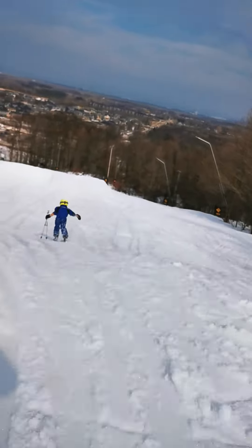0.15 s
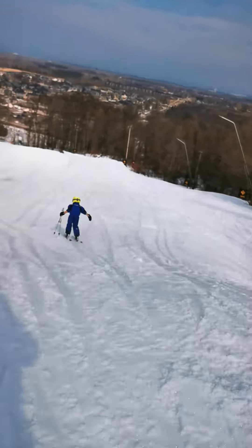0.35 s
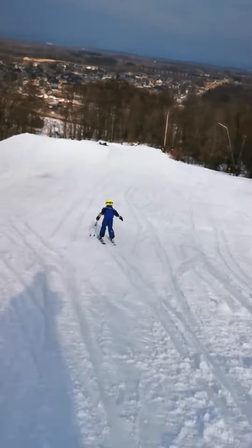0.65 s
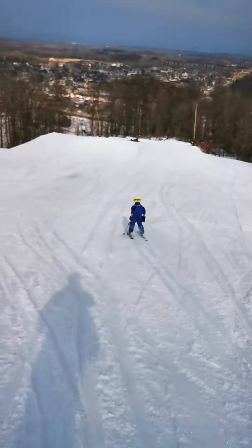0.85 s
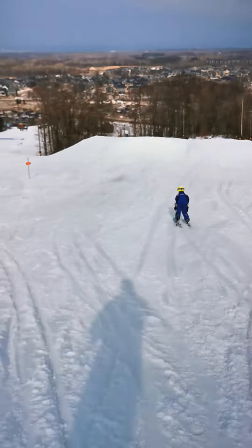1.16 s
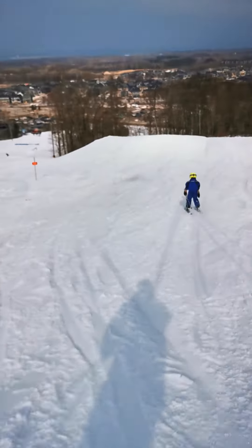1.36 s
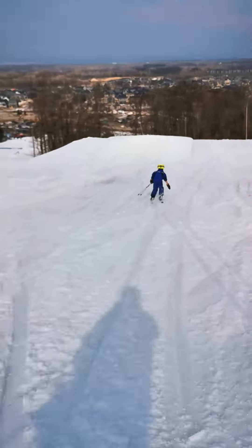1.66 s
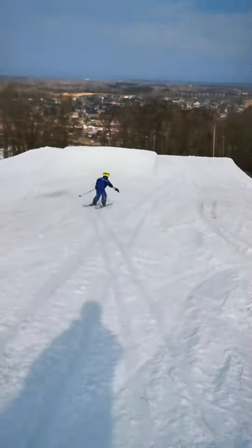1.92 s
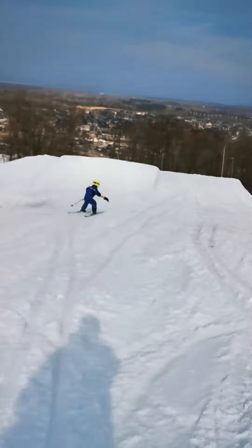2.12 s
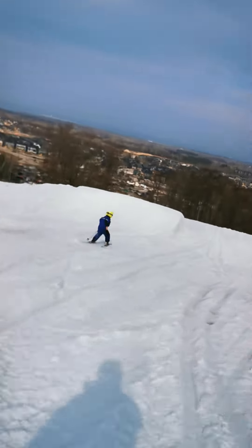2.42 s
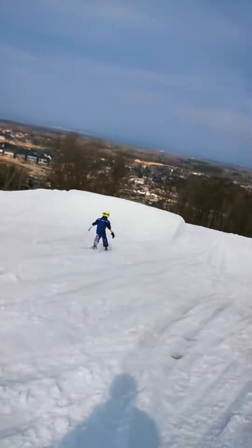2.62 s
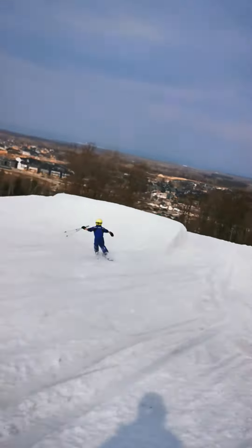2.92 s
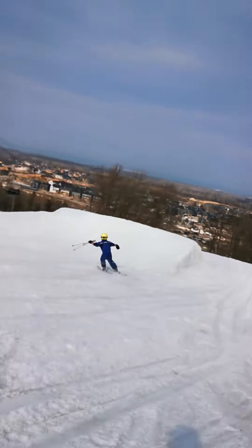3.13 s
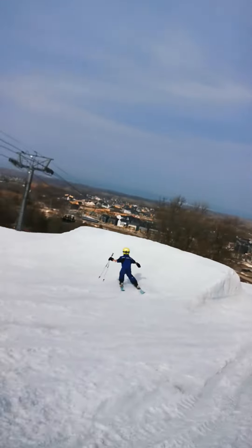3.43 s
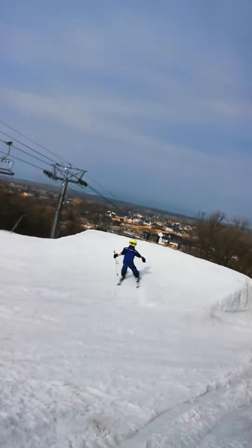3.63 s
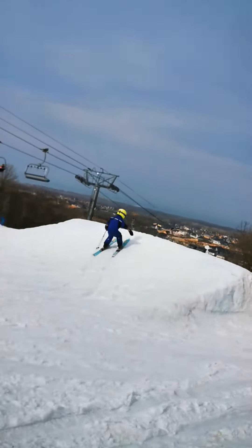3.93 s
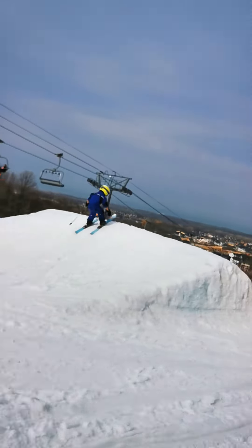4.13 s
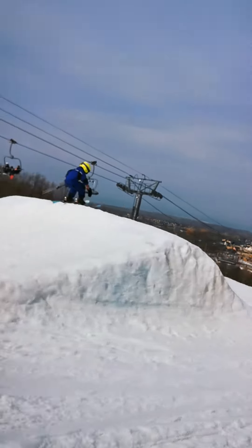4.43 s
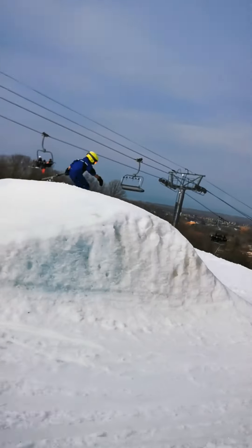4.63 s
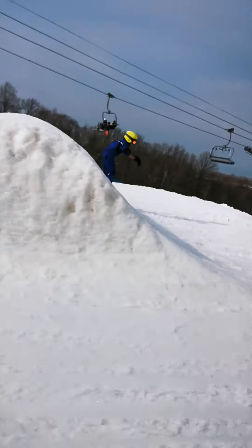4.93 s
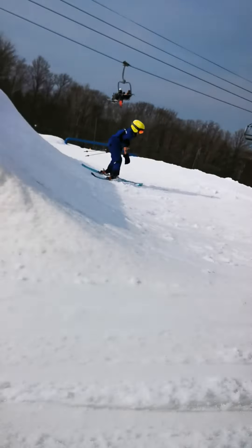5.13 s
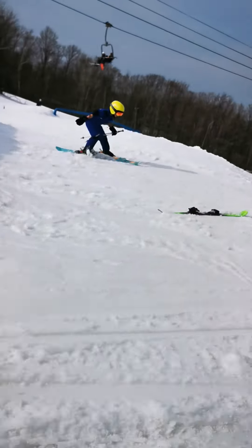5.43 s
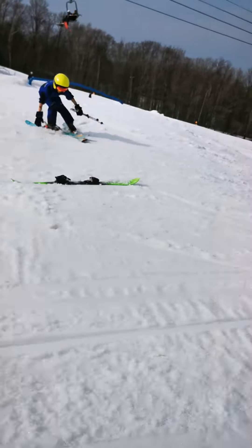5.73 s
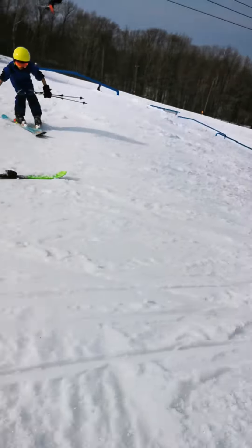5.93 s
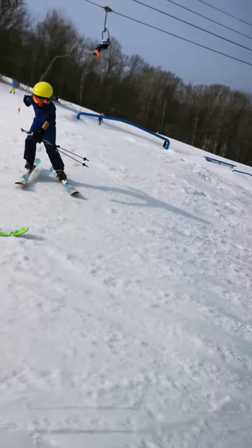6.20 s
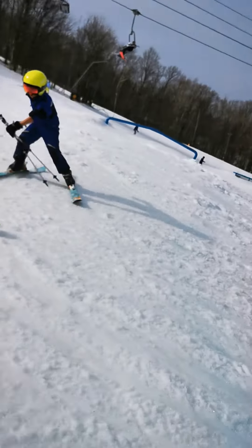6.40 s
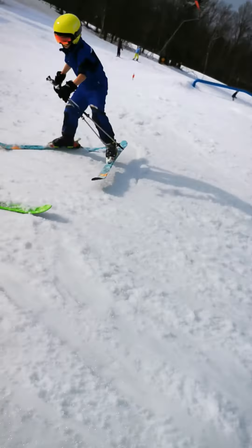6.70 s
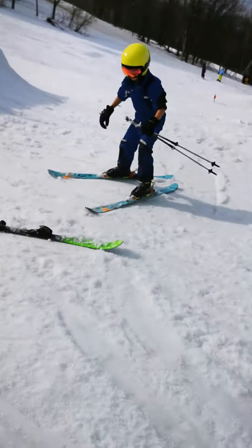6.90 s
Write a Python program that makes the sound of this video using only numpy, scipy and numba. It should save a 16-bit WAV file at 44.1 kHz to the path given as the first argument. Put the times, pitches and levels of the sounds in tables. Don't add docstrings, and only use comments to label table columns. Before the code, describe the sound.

A handheld phone travels down an open snowy slope on skis. Strong wind rumbles, flutters and snaps unevenly against its two microphone ports, heavier on the right, while skis hiss brightly over granular snow. A small binding tick comes early. Late on the wind fades, a second pair of skis scrapes to a halt nearby, and dull knocks of gear and boots end in faint hush.

```python
import sys
import numpy as np
from scipy import signal
from scipy.fft import rfft, irfft
from scipy.io import wavfile
from scipy.ndimage import uniform_filter1d, map_coordinates
from numba import njit

SR = 44100
rng = np.random.default_rng(int(sys.argv[2]) if len(sys.argv) > 2 else 0)


def generate_wav(sig):
    pcm = np.round(np.clip(np.atleast_2d(sig).T, -1, 1) * 32767).astype(np.int16)
    wavfile.write(sys.argv[1], SR, pcm)


def to_linear_factor(level_db):
    exponent = np.asarray(level_db, float) / 20
    return 10 ** exponent


N = 311346

# (time [s], strength [dB], fineness of eddies [dB])
WIND_LEFT = [(0, -7.5, -3), (0.11, -40, -8), (0.92, -44, -9), (1.37, -25.5, -3.5), (1.49, -21, 2.2),
             (1.85, -31, -3.7), (2.84, -36, -5.5), (3.23, -26.5, -0.0), (3.98, -21, 1.5), (4.43, -24, 3),
             (4.61, -37.5, 0), (4.91, -15.5, 0.5), (5.36, -17.5, -2.5), (5.6, -24, -2.3), (5.99, -44, 17),
             (6.44, -42, 22), (6.65, -49.5, 25), (7.05, -43, 20)]
WIND_RIGHT = [(0, -22.5, -1.5), (0.65, -18, 0), (1.19, -11, 6), (1.31, -9.5, 9), (1.49, -14, 4.26),
              (2.72, -9, 0.9), (3.08, -11, -1), (4.22, -13, 0), (4.34, -13.5, 7), (4.46, -16, -0.5),
              (4.64, -11, 5), (5.0, -10, -3.5), (5.78, -22.5, -2), (6.2, -36.5, -7), (6.32, -36, -6.5),
              (6.65, -49, 2), (6.83, -62, 11), (7.05, -51, 0)]
# (time [s], half length [s], strength change [dB], fineness change [dB])
PUFFS_LEFT = [(0.264, 0.065, -19, 0), (0.47, 0.022, -7.8, 8), (0.66, 0.078, -11, 11), (0.951, 0.027, 27, 7),
              (1.29, 0.025, -8.8, -3), (1.507, 0.08, -17.9, -6), (1.71, 0.047, -4, 10),
              (1.88, 0.16, 16.5, 0.5), (1.942, 0.033, 3, 3), (2.153, 0.051, 13, -2),
              (2.286, 0.035, -26, -2.2), (2.36, 0.048, 13, -3.5), (2.4, 0.071, 18.5, 5.5),
              (2.49, 0.05, 7, -2.9), (2.89, 0.012, 16, 3), (3.05, 0.016, 7, -3), (3.237, 0.17, 8.5, 1.5),
              (3.415, 0.03, 14, -6), (3.555, 0.013, 12.5, 7), (3.875, 0.025, 10, -3), (4.34, 0.021, 11, -6),
              (4.683, 0.045, 5, -10), (4.79, 0.01, 18, -1), (5.18, 0.0099, 9, -8), (5.27, 0.14, 8, 3.5),
              (5.636, 0.052, 8.5, -2), (5.82, 0.078, -15, -2), (6.8, 0.07, -5.5, 5)]
PUFFS_RIGHT = [(0.042, 0.049, 4, 2), (0.13, 0.039, 4.7, 4), (0.72, 0.087, -7.5, 1.5),
               (0.86, 0.061, -1.7, -4), (1.02, 0.051, -1.4, -3), (1.35, 0.038, -4.2, -8.5),
               (1.82, 0.037, -4, -1), (2.1, 0.025, -2.5, 9), (2.41, 0.043, -6, -1.3), (3.05, 0.081, 1.5, 5),
               (3.168, 0.025, 3.5, 5), (4.73, 0.047, -1.8, -3.5), (4.83, 0.023, -8.5, -7.5),
               (5.068, 0.039, -5, -1.7), (5.141, 0.024, -21.5, -2.5), (5.33, 0.0074, 11, 19),
               (5.38, 0.021, -20, 5), (5.44, 0.01, -6, -3), (5.51, 0.01, -10, -3.4), (5.58, 0.015, -4, 1),
               (5.67, 0.025, -9, -6), (5.752, 0.026, 9.5, -6), (5.821, 0.045, -14.5, -2),
               (5.93, 0.1, 6.5, 1.8), (6.06, 0.032, -12, -1), (6.24, 0.021, 11, 4), (6.38, 0.025, -7.3, 13),
               (6.96, 0.022, 15, 6)]
# (time [s], peak [dB])
SNAPS_LEFT = [(0.032, -37), (1.659, -15), (1.826, -21), (1.884, -16), (1.935, -16), (1.946, -33),
              (2.354, -19), (2.363, -38), (2.381, -37), (2.411, -25), (3.051, -31), (3.062, -23),
              (3.073, -29), (3.415, -26), (3.423, -33), (3.471, -27), (3.561, -37), (4.78, -25),
              (4.788, -39), (4.92, -33), (4.935, -33), (4.961, -12), (4.969, -22), (5.174, -22),
              (5.185, -39), (5.236, -15), (5.322, -16), (5.336, -22), (5.344, -23)]
SNAPS_RIGHT = [(1.196, -11), (1.315, -4.5), (1.329, -13.5), (1.785, -16.5), (2.182, -25), (2.53, -15.5),
               (2.655, -8.5), (2.672, -6.5), (2.73, -15), (2.774, -12), (2.797, -15), (3.163, -17),
               (3.177, -15), (3.333, -14), (3.395, -14), (3.65, -13), (3.769, -12.5), (3.954, -16.5),
               (4.149, -23), (4.537, -14.5), (4.582, -12.5), (4.62, -7), (4.723, -9), (4.784, -10.5),
               (4.877, -11), (4.89, -13), (4.935, -11.5), (5.026, -15), (5.473, -21), (5.763, -13)]
# (level in usual wind [dB], slope on strength [dB/dB], slope on fineness [dB/dB])
LAW_LEFT = [
    (-24.5, 0.44, -0.72),
    (-23.5, 0.55, -0.14),
    (-36.5, 1.43, 1.5354),
]
LAW_RIGHT = [
    (-26, 0.82, -1.83),
    (-20, 0.8, -0.055),
    (-32.5, 1.45, 0.23),
]
USUAL_WIND_DB = -20

# (time [s], spray level [dB])
SPRAY = [(0, -26), (0.62, -25.5), (0.77, -35), (1.52, -26), (1.64, -21.5), (1.85, -25), (2.15, -23.5),
         (2.3, -36.5), (2.42, -25), (2.78, -29.5), (3.11, -23.5), (3.92, -24.5), (4.37, -24.5),
         (5.33, -26.5), (5.96, -23.7), (6.62, -20.5), (6.83, -37), (7.05, -37)]
# (time [s], half length [s], spray change [dB])
BUMPS = [(0.07, 0.087, 1.5), (0.83, 0.04, -2.5), (0.96, 0.055, 4), (2.27, 0.04, -3.5), (2.33, 0.03, 7.5),
         (2.53, 0.06, -3.5), (2.74, 0.051, -4), (3.2, 0.043, -3.5), (3.57, 0.069, -1.5), (3.7, 0.06, 2.5),
         (3.83, 0.07, -1.7), (4.02, 0.023, -2.5), (4.25, 0.057, -2.5), (4.5, 0.085, 1.2),
         (5.06, 0.089, -4.5), (5.36, 0.077, -4), (5.61, 0.093, 3), (6.12, 0.019, -1), (6.41, 0.022, 1),
         (6.96, 0.032, 6)]
# (time [s], half length [s], scrape change [dB])
EDGES = [(.01, 0.055, 9.5), (.23, .04, 12.5), (.44, 0.067, 12.5), (.55, 0.036, 12), (.79, 0.076, 21),
         (1.0, .1, -13), (1.66, 0.17, 6), (1.96, 0.18, 4.5), (2.64, 0.065, 0), (3.05, 0.048, 5),
         (3.47, 0.014, 14), (4.0, 0.11, 7), (4.8, .15, 3), (5.2, 0.11, -13), (5.6, 0.23, 7.5),
         (5.8, 0.088, -19), (6.25, 0.74, -7.5), (6.66, 0.026, 13)]
# (time [s], left minus right [dB])
SKI_SIDE = [
    (0, -12),
    (1.4, -10.5),
    (2.12, -7.5),
    (2.87, -17.5),
    (3.3, -9),
    (5.09, -12),
    (5.9, -4.5),
    (6.65, -4),
    (6.8, -9),
]
# (time [s], left port lag [samples], share of dull spray common to both ports [0-1])
BEARING = [
    (0, 22, .12),
    (4.95, 21.5, .1),
    (5.15, 20.5, .45),
    (5.55, 21, .08),
    (5.83, 18.5, .5),
    (6.1, 21, .4),
    (6.55, 22.5, .35),
    (6.75, 21, .35),
    (6.92, 21.5, .8),
]
# (frequency [Hz], density [dB per Hz])
PORT_LEFT = [(500, -5), (2000, -4), (3500, -6), (8500, -5), (10000, -11.5), (14300, -10), (15000, -16),
             (15800, -23)]
PORT_RIGHT = [(500, -7), (1000, -9), (2300, -9), (3500, -12), (5500, -5.7), (6200, -8.6), (6900, -1.8),
              (7900, -11.5), (9500, -6), (10800, -0.8), (12200, -4.5), (13300, -0.8), (14000, -5),
              (15000, 2)]
USUAL_SPRAY_DB = -25

# (time [s], peak [dB], pitch [Hz], decay [s], left minus right [dB])
KNOCKS = [
    (.669, -25, 2310, 0.002, -11),
    (0.693, -36, 2000, .003, -9),
    (0.779, -48, 2420, 0.0024, -20),
    (6.953, -39.5, 350, 0.012, -3),
    (7.019, -29.5, 211, 0.0034, 2),
]
PORT_LAG_SAMPLES = 22


def level(x):
    return x / np.sqrt(np.mean(x ** 2))


def curves(table):
    time_s, *columns = np.transpose(table)
    return [np.interp(np.arange(N) / SR, time_s, c) for c in columns]


def swells(table):
    time_s, half_s, *columns = np.array(table).T[:, :, None]
    coarse_s = np.arange(0, N, 64) / SR
    bells = np.exp(-((coarse_s - time_s) / np.maximum(half_s, .005)) ** 2)
    sums = [(c * bells).sum(axis=0) for c in columns]
    return np.array([np.interp(np.arange(N) / SR, coarse_s, total) for total in sums])


def walk(rate_hz):
    hold = int(SR / rate_hz)
    steps = np.repeat(rng.standard_normal(N // hold + 1), hold)
    return level(uniform_filter1d(uniform_filter1d(steps, hold), hold)[:N])


@njit
def svf(x, hz, damp):
    out = np.empty((2, len(x)))
    band_state, low_state = 0., 0.
    for i in range(len(x)):
        g = np.tan(np.pi * hz[i] / SR)
        v = (band_state + g * (x[i] - low_state)) / (1 + g * (g + damp))
        out[0, i] = low_state + g * v
        out[1, i] = damp * v
        band_state, low_state = 2 * v - band_state, low_state + 2 * g * v
    return out


def band(x, hz, damp):
    hz = np.clip(hz * np.ones(N), 10, .4 * SR)
    return level(svf(svf(x, hz, damp)[1], hz, damp)[1])


def low(x, hz, damp):
    hz = np.clip(hz * np.ones(N), 10, .4 * SR)
    return level(svf(svf(x, hz, damp)[0], hz, damp)[0])


def low_once(x, hz, damp):
    return svf(x, np.full(N, hz), damp)[0]


def colour(x, points):
    hz, db = np.transpose(points)
    log_hz = np.log(np.arange(N // 2 + 1) * SR / N + 1)
    shape_db = np.interp(log_hz, np.log([hz[0] / 4, *hz]), [db[0] - 11, *db])
    return level(irfft(rfft(x) * to_linear_factor(shape_db), N))


def bursts(times_s, peaks_db, rise_s, decay_s):
    t = np.arange(N) / SR
    out = np.zeros(N)
    for s, db in zip(times_s, peaks_db):
        i = slice(max(int((s - 5 * rise_s) * SR), 0), int((s + 8 * decay_s) * SR))
        out[i] += to_linear_factor(db) * np.exp(np.minimum((t[i] - s) / rise_s, (s - t[i]) / decay_s))
    return out


def late(x, lag_samples):
    return map_coordinates(x, [np.arange(N) - lag_samples], mode="mirror")


def wind(table, snaps, puffs, law):
    strength_db, fine_db = curves(table) + swells(puffs)
    rumble_db, buffet_db, tear_db = (
        db + per_strength * (strength_db - USUAL_WIND_DB) + per_fine * fine_db
        for db, per_strength, per_fine in law)
    tear_db = tear_db - 1.4 * np.maximum(-36.5 - strength_db, 0)
    buffet_db = buffet_db - 0.55 * np.maximum(-29.5 - strength_db, 0)
    flutter = walk(30.)
    jolt = walk(140.)
    noise = rng.standard_normal((5, N))

    rumble = low(band(noise[0], 47.0, 7.3), 120 * 2 ** (0.26 * flutter), 1.0)
    rumble = rumble * to_linear_factor(2.0 * flutter)

    buffet_hz = 470 * 2 ** (0.31 * flutter + 0.035 * (buffet_db + 26))
    buffet = low(band(noise[1], 172.7, 2.0), buffet_hz, 1.205)
    buffet = buffet * to_linear_factor(0.32 * flutter + 2.45 * jolt)

    tear_hz = 760 * 2 ** (0.015 * flutter + 0.21 * jolt)
    tear = low(band(noise[2], 599.0, 0.96), tear_hz, 1.23)
    tear = tear * to_linear_factor(2.0 * flutter + 0.24 * jolt)

    grain_db = 1.6 * rng.exponential(size=N) + 0.75 * jolt + 1.8 * flutter
    breaks = (rng.random(N) < 2200 / SR) * to_linear_factor(grain_db) * noise[3]
    crackle = low(band(breaks, 638.0, 1.49), 3630.0, 1.62)

    snap = low(band(noise[4], 428.0, 1.71), 2730.0, 1.32)
    snap = snap * bursts(*np.transpose(snaps), rise_s=0.0017, decay_s=0.0041)

    steady = to_linear_factor(rumble_db + 2.0) * level(rumble)
    steady = steady + to_linear_factor(buffet_db - 0.94) * level(buffet)
    steady = steady + to_linear_factor(tear_db) * level(tear)
    return steady + to_linear_factor(1.05 * tear_db - 8) * crackle + to_linear_factor(3.0) * snap


def skis():
    right_db = curves(SPRAY)[0] + swells(BUMPS)[0]
    side_db = curves(SKI_SIDE)[0]
    near_db = side_db + 11.0
    over_db = right_db - USUAL_SPRAY_DB
    scrape_db = -42.5 + 1.9 * over_db + swells(EDGES)[0]
    patch_db = .6 * walk(16.) + .7 * walk(60.) + .8 * walk(300.)
    noise = rng.standard_normal((3, N)) * to_linear_factor(patch_db)

    spray = [n + .14 * walk(18.) * low_once(n, 7500., 1.6) for n in noise[:2]]
    dull = [low_once(n, 4200., 1.4) for n in spray]
    lag_samples, share = curves(BEARING)
    lag_samples = lag_samples + .5 * walk(5.)
    common = np.sqrt(1 - (1 - share) ** 2) * late(dull[1], lag_samples - 2)
    left = to_linear_factor(right_db + side_db - 6.5) * colour(spray[0] - share * dull[0] + common, PORT_LEFT)
    right = to_linear_factor(right_db + 2.5) * colour(spray[1], PORT_RIGHT)
    dull_gain = to_linear_factor(0.2 * near_db + 0.083 * over_db - 0.5)
    right = right + (dull_gain - 1) * low_once(right, 7000., 0.55)

    lumps = noise[2] * to_linear_factor(2.2 * walk(70.))
    body = to_linear_factor(1.1 * near_db - 5) * band(lumps, 1020.0, 1.57)
    edge_hz = 2300 * 2 ** (0.023 * walk(6.))
    edge = to_linear_factor(-0.7 * near_db - 1.5) * band(lumps, edge_hz, 0.54)
    scrape = to_linear_factor(scrape_db) * (edge + body)
    left_scrape = to_linear_factor(-10.5 + 1.2 * near_db) * late(scrape, lag_samples)
    return np.array([left + left_scrape, right + to_linear_factor(-1.5) * scrape])


def knocks():
    out = np.zeros((2, N))
    for time_s, peak_db, hz, decay_s, pan_db in KNOCKS:
        tick = band(rng.standard_normal(N), hz, 1.1)
        tick = tick * bursts([time_s], [peak_db], 0.00035, decay_s)
        out[0] += to_linear_factor(pan_db / 2) * np.roll(tick, PORT_LAG_SAMPLES)
        out[1] += to_linear_factor(-pan_db / 2) * tick
    return out


def air():
    hush = band(rng.standard_normal(N), 450., 2.6)
    return to_linear_factor(-63.0) * np.array([np.roll(hush, PORT_LAG_SAMPLES), hush])


def scene():
    wind_left = wind(WIND_LEFT, SNAPS_LEFT, PUFFS_LEFT, LAW_LEFT)
    wind_right = wind(WIND_RIGHT, SNAPS_RIGHT, PUFFS_RIGHT, LAW_RIGHT)
    return np.array([wind_left, wind_right]) + skis() + knocks() + air()


def band_limit(x):
    return signal.sosfilt(signal.butter(12, 17070, fs=SR, output="sos"), x)


def record(dry):
    rounded = dry / (1 + np.abs(dry) ** 8) ** (1 / 8)
    top_cut = signal.ellip(10, .2, 80, 15620, fs=SR, output="sos")
    mix = signal.sosfilt(top_cut, rounded)
    return band_limit(mix)


dry = scene()
out = record(dry)
generate_wav(out)
```